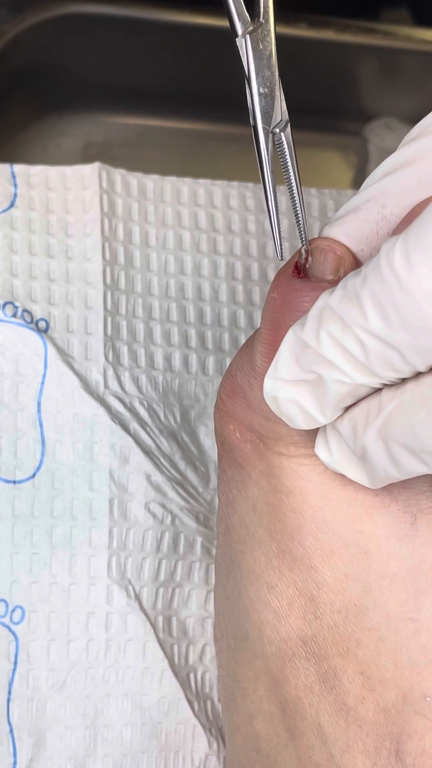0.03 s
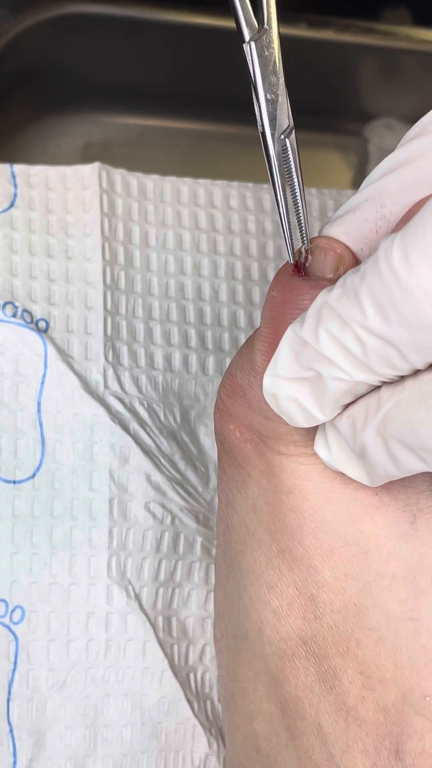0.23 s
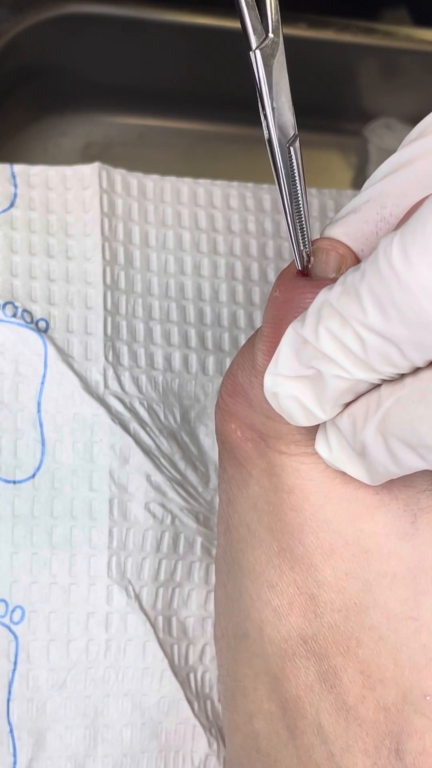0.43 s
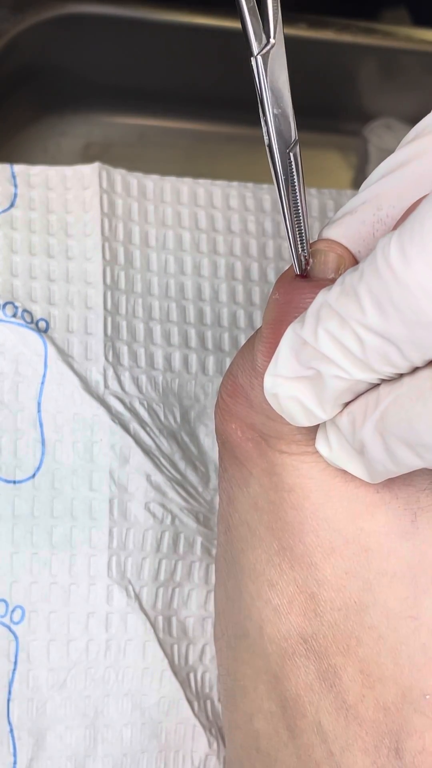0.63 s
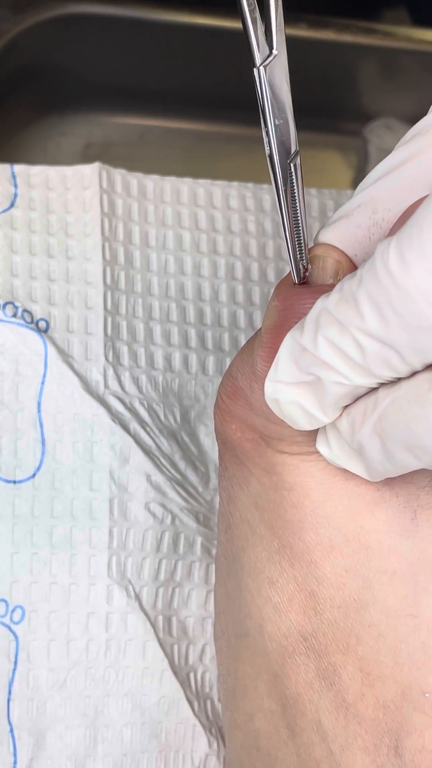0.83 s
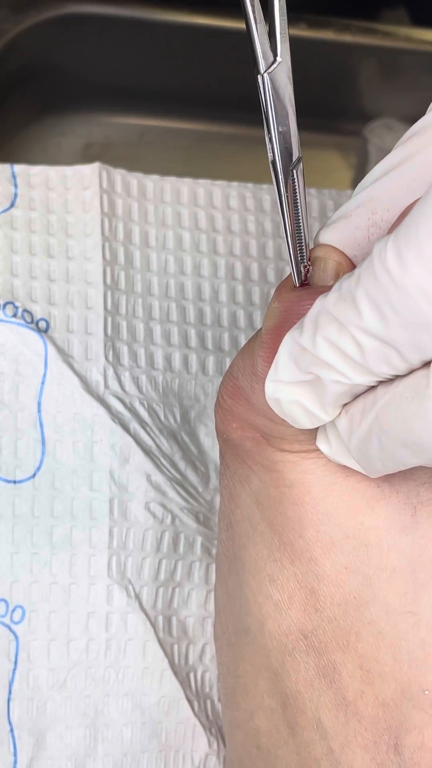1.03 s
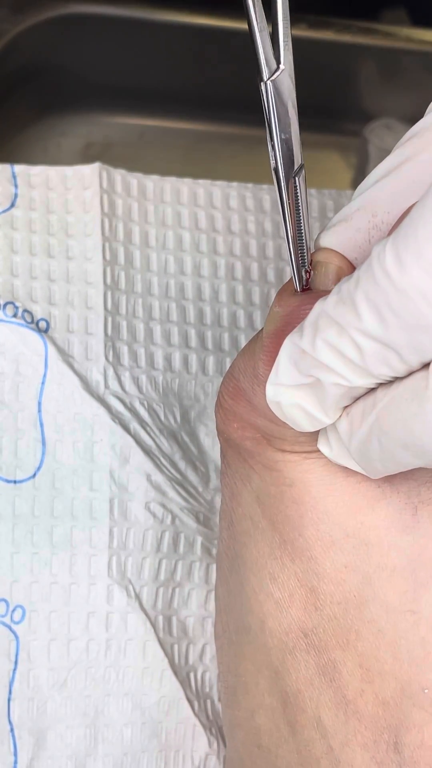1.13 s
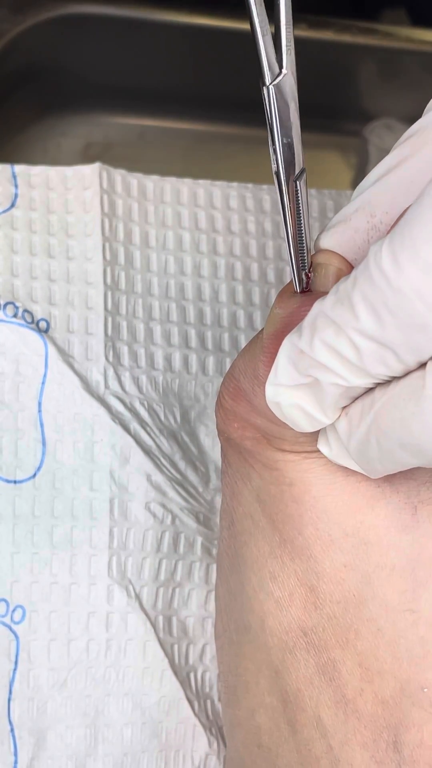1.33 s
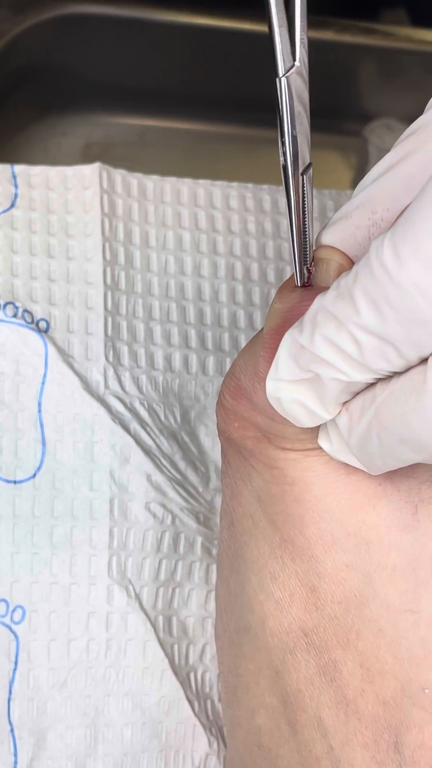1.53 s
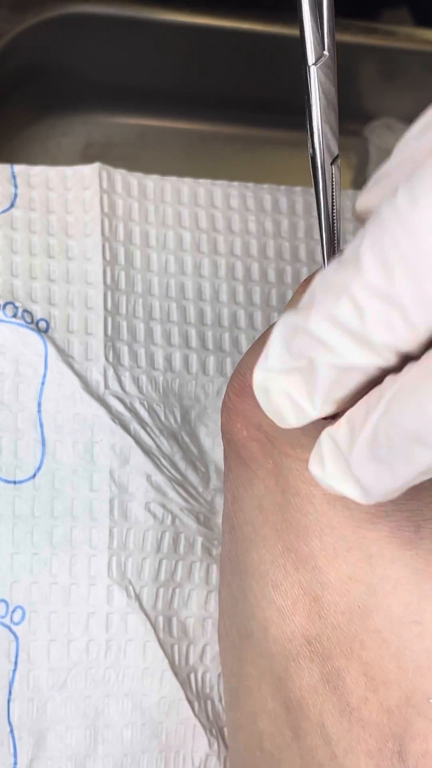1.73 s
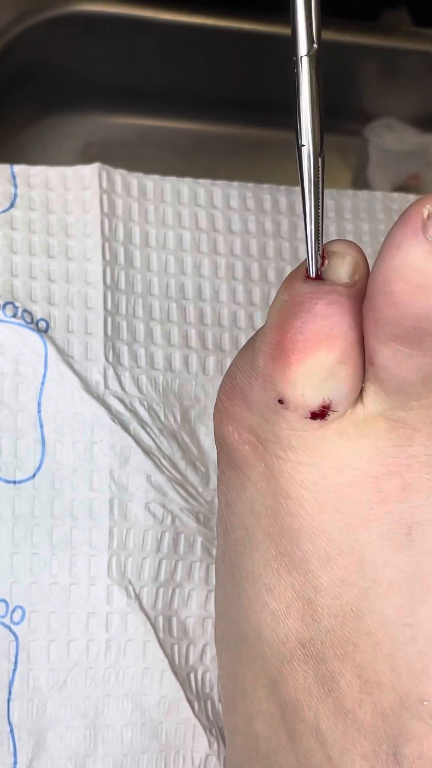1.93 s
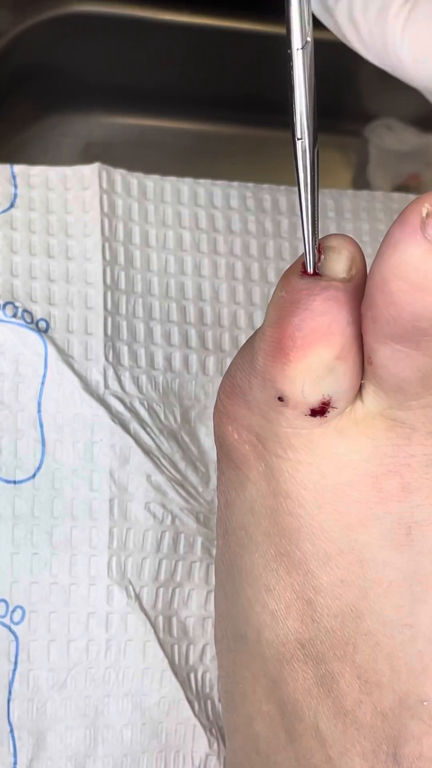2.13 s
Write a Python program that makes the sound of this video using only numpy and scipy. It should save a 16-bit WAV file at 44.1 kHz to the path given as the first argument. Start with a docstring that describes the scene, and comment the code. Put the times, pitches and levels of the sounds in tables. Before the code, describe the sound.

Quiet ventilation rumble and a few barely audible dull brushes come first, then a close metal clamp snaps twice, dry and piercing, with a short small-room tail, tiny metallic ticks and faint paper rustle.

```python
"""A steel surgical clamp is squeezed shut close by: two ratchet teeth snap home, with tiny ticks around them.
Each blow rings a bank of short-lived sine modes with a gritty scrape; a small clinic room adds a noise tail.
A gloved hand rustles over a paper drape as crinkled hiss, and soft brushes are dull swells of noise.
Below lie ventilation rumble and hiss, made of shaped noise, and a wavering mains hum of sines."""
import sys
import numpy as np
from scipy import signal
from scipy.fft import rfft, irfft, next_fast_len
from scipy.io import wavfile
from scipy.ndimage import uniform_filter1d

SR = 44100
rng = np.random.default_rng(int(sys.argv[2]) if len(sys.argv) > 2 else 0)


def master_out(mix):
    """Clip the mix to full scale and print it as 16-bit PCM to the path in sys.argv[1]."""
    frames = np.transpose(np.atleast_2d(mix))
    ceiling = np.clip(frames, -1, 1)
    pcm = np.round(ceiling * 32767).astype(np.int16)
    wavfile.write(sys.argv[1], SR, pcm)


def linear_from_db(decibels):
    """Turn decibels (scalar or array-like) into linear amplitude factors; 0 gives 1."""
    return 10 ** (np.asarray(decibels, float) / 20)


N = 96138

# Steel modes of the clamp, damped by the hand: pitch_hz, relative level_db, t60_s
STEEL_MODES = [(320, -18, .012), (610, -10, .014), (980, -10, .011), (1450, -11, .004), (1900, -8, .006),
               (2620, -1.5, .0075), (3150, -11, .006), (3550, -11, .005), (4050, -18, .006),
               (4720, -9, .011), (5100, -10, .007), (5900, -14, .006), (6550, -10, .005), (7150, -4, .004),
               (7800, -2, .003), (8700, -5, .0036), (9780, 1, .0033), (10950, -12, .006),
               (12050, -3, .0045), (13060, -12, .005), (13360, -1, .003), (14100, 8, .0035),
               (15280, -4, .004), (16150, -16, .004)]
# Steel meets steel, a ratchet tooth lands and rebounds: start_s, level_db, centre_hz, spread_octaves
STEEL_BLOWS = [(1.465, -44.5, 9500, 0.47), (1.4644, -58, 3600, 0.23), (1.503, -57, 6600, 0.64),
               (1.513, -58.5, 2600, 0.27), (1.54632, -27, 2500, 1.3), (1.5467, -4, 11000, 1.5),
               (1.54785, -19, 2200, 1.4), (1.5482, -40, 330, .6), (1.60672, -24, 2500, 1.3),
               (1.607, -3, 12000, 1.7), (1.6073, -5, 14900, .08), (1.6077, -13, 6500, .5),
               (1.60825, -14, 2800, 1.5), (1.609, -37, 380, .6), (1.7274, -34, 10380, 0.65),
               (1.78, -46, 2600, 0.34), (1.786, -52, 3900, 0.42), (1.794, -48, 3100, 0.094),
               (1.836, -50.5, 4450, 1.1), (1.9322, -47, 2650, 0.1), (1.933, -45, 4100, 0.11),
               (2.079, -53, 635, 0.43)]
# How long the room rings: frequency_hz, t60_s
ROOM_DECAY = [(300, 0.44), (1000, 0.16), (2500, 0.32), (5000, 0.3), (9000, 0.14), (15000, 0.9)]
# Colour of the room tail at its start: frequency_hz, relative level_db
ROOM_COLOUR = [(300, 7), (650, 8), (1300, 2.5), (2000, 2), (2800, -0.5), (3500, 3), (5000, 0.5),
               (7000, -3.5), (10000, -7.5), (12000, -9), (13500, -27.5), (15500, -16.5)]
# Hand and paper moving: time_s, level_db
HAND_MOVES = [(1.44, -99), (1.47, -85), (1.7, -64), (1.74, -60.5), (1.8, -72.5), (1.86, -74), (1.92, -68.5),
              (1.966, -67), (1.98, -82.5), (2.05, -81), (2.13, -79.5), (2.155, -72.5), (2.18, -65)]
# Colour of the papery hiss: frequency_hz, relative level_db (per Hz)
PAPER_COLOUR = [(500, -23), (1000, -8), (2700, 2), (4500, -4.5), (7000, -6), (10000, -4), (14500, -13),
                (16500, -11)]
# Soft dull brushes and bumps further off: peak_s, level_db, rise_s, fall_s, top_hz
BRUSH_MOVES = [(0.679, -64, 0.026, 0.077, 2330), (0.841, -60.5, 0.16, .045, 312),
               (1.012, -50.5, 0.041, 0.07, 185.5), (1.0, -59.5, 0.048, .05, 475),
               (1.188, -59.5, 0.1, 0.062, 198.4), (2.079, -71, 0.0032, 0.028, 910)]
# Colour of the brushes: frequency_hz, relative level_db (per Hz)
BRUSH_COLOUR = [(60, -27), (130, -5), (200, -12.5), (600, -11), (1200, -16), (3000, -23.5)]
# Uneven level of the low rumble: time_s, level_db
RUMBLE_LEVEL = [(0.0, -44.5), (0.07, -53.5), (0.389, -52), (0.409, -60.5), (0.54, -54), (0.56, -62.5),
                (0.68, -55.5), (0.76, -48.5), (0.79, -52.5), (0.811, -46.5), (1.2, -58.5), (1.24, -45.5),
                (1.289, -57), (1.38, -48), (1.82, -65), (1.85, -51), (1.999, -50), (2.18, -57)]
# Duct resonances: frequency_hz, relative level_db (per Hz)
DUCT_RESONANCES = [(15, -45), (28, -26), (38, -8), (46, -11), (53, 0), (62, -12), (72, -7), (85, -16),
                   (110, -40), (200, -120)]
# Colour of ventilation and room hiss: frequency_hz, relative level_db (per Hz)
AIR_COLOUR = [(40, -35), (80, -8), (110, 2.6), (200, 0.7), (350, -11), (600, -15.5), (1200, -25.5),
              (2500, -30.5), (4500, -39.5), (7000, -43), (10000, -45.5), (13000, -50), (16000, -64.5)]
# Mains hum, before its waver and lift: pitch_hz, level_db
MAINS_HUM = [(120, -73.5), (240, -76.5), (360.5, -78), (721, -88)]
# Left-right likeness of diffuse sound: frequency_hz, likeness (1 = identical)
LIKENESS = [(30, .99999), (70, .9995), (150, .96), (290, .85), (640, .4), (1400, .3), (2300, .8),
            (4000, .9), (7500, .95), (16000, .9)]
# Phase between the two microphone ports: frequency_hz, left_lead_radians
PORT_PHASE = [(0, 0), (150, -.03), (550, -.55), (1500, -.7), (2350, .85), (4600, .8), (5050, -.1),
              (5600, .6), (7600, 3.1), (10800, 6.1), (11800, 6.5), (14300, 9.4), (16000, 10.5), (22050, 14)]
# Balance between the two ports: frequency_hz, left_over_right_db
PORT_BALANCE = [(70, 0), (200, 1.4), (600, 1.8), (1200, .1), (16000, 0)]
# Random patchiness of each diffuse layer: layer name, spread_db
PATCHINESS = {"room": 1.2, "paper": 2., "brush": 2., "air": 1.6}


def evened(x):
    """Scales a signal to an rms of one."""
    return x / np.sqrt(np.mean(x ** 2) + 1e-20)


def read_curve(points, hz):
    """Reads a table between its points on a logarithmic frequency axis."""
    f, value = np.transpose(points)
    return np.interp(np.log(hz + 1), np.log(f + 1), value)


def follow(points):
    """Turns a table of time_s, level_db into a gain for every sample."""
    return linear_from_db(np.interp(np.arange(N) / SR, *np.transpose(points)))


def diffuse(size, field_db, patchy_db):
    """Stereo noise from random short-time spectra; field_db(hz, t) colours it, LIKENESS ties left to right."""
    hop = size // 4
    hz = np.fft.rfftfreq(size, 1 / SR)[:, None]
    t = np.arange(N // hop + 5) * hop / SR
    a, b, c, d, patches = rng.standard_normal((len(t), len(hz), 5)).T
    # level patches smoothed over neighbouring frequencies, then over time
    patches = uniform_filter1d(patches, size=8, axis=0)
    patches = evened(uniform_filter1d(patches, size=12, axis=1))
    same = np.clip(read_curve(LIKENESS, hz), -1, 1)
    left = a + 1j * b
    right = same * left + np.sqrt(1 - same ** 2) * (c + 1j * d)
    spectra = np.array([left, right]) * linear_from_db(field_db(hz, t) + patchy_db * patches)
    return signal.istft(spectra, nperseg=size, noverlap=size - hop)[1][:, :N]


def clamp():
    """Blows ring the steel modes nearest their centre and add a scrape; rows: direct, towards the walls."""
    contact_s = .00008  # time constant of a blow's rise
    scrape_db, scrape_s = -12, .001  # scrape peak before the blow's level, and its decay
    scatter_s = .006  # each blow reaches the walls by its own path, up to this much later
    room_blur = .3  # the walls hear the steel from all sides: modes blur, as if this much shorter
    length = 2000  # samples kept of a blow
    out = np.zeros((2, N + length))
    t = np.arange(length) / SR
    hz, mode_db, t60 = np.transpose(STEEL_MODES)[:, :, None]
    sign = (-1.) ** np.arange(len(hz))[:, None]
    grit = rng.standard_normal((len(STEEL_BLOWS), length))
    paths = (scatter_s * SR * rng.random(len(STEEL_BLOWS))).astype(int)
    for (start_s, level_db, centre_hz, octaves), noise, path in zip(STEEL_BLOWS, grit, paths):
        at = int(start_s * SR)
        since = np.maximum(t - (start_s * SR - at) / SR, 0)  # starts between samples
        share = np.exp(-.5 * (np.log2(hz / centre_hz) / octaves) ** 2) * linear_from_db(mode_db)
        rise = 1 - np.exp(-since / contact_s)
        for row, decay_s in enumerate((t60, room_blur * t60)):
            modes = sign * share * linear_from_db(-60 * since / decay_s) * np.sin(2 * np.pi * hz * since)
            ring = modes.sum(0) / np.linalg.norm(share)
            scrape = signal.oaconvolve(noise * np.exp(-since / scrape_s), ring)[:length]
            scrape = linear_from_db(scrape_db) * scrape / np.abs(scrape).max()
            begin = at + row * path
            out[row, begin:begin + length] += linear_from_db(level_db) * (ring + scrape) * rise
    return out[:, :N]


def room(spread):
    """The walls answer with a dense tail after a short gap, each band dying at its own speed."""
    room_db, gap_s = -7.5, .001

    def dying(hz, t):
        return read_curve(ROOM_COLOUR, hz) - 60 * t / read_curve(ROOM_DECAY, hz)

    tail = diffuse(size=128, field_db=dying, patchy_db=PATCHINESS["room"])[:, :SR // 2]
    tail = tail * (np.arange(SR // 2) > gap_s * SR)
    tail = tail / np.linalg.norm(tail[0])
    return linear_from_db(room_db) * signal.fftconvolve(spread[None], tail, axes=1)[:, :N]


def rustle():
    """Fine crinkles of uneven size roughen a papery hiss that follows the hand."""
    grains_per_s, grain_db = 4000, 2.5  # average density; scale of the random size
    crinkle_s = .001  # decay of one crinkle
    sizes = linear_from_db(grain_db * np.minimum(rng.exponential(1, N), 5))
    grains = sizes * (rng.random(N) < grains_per_s / SR)
    crinkle = signal.lfilter([1], [1, -np.exp(-1 / (crinkle_s * SR))], grains)
    hiss = diffuse(size=256, field_db=lambda hz, t: read_curve(PAPER_COLOUR, hz),
                   patchy_db=PATCHINESS["paper"])
    return evened(hiss * crinkle) * follow(HAND_MOVES)


def brushes():
    """Dull noise swells and fades for each brush, dark above its top frequency."""
    t = np.arange(N) / SR
    out = np.zeros((2, N))
    for peak_s, level_db, rise_s, fall_s, top_hz in BRUSH_MOVES:
        def dull(hz, t):
            return read_curve(BRUSH_COLOUR, hz) - 10 * np.log10(1 + (hz / top_hz) ** 8)

        noise = evened(diffuse(size=512, field_db=dull, patchy_db=PATCHINESS["brush"]))
        swell = np.exp(-((t - peak_s) / rise_s) ** 2)
        fade = np.exp(-abs(t - peak_s) / fall_s)
        out += linear_from_db(level_db) * noise * np.where(t < peak_s, swell, fade)
    return out


def rumble():
    """Noise in the low duct resonances, the same in both channels, at an uneven level."""
    steady_s, steady_share = .08, .7  # slow chance swings are evened out over this time, by this share
    spectrum = rng.standard_normal((N // 2 + 1, 2)) @ [1, 1j]
    resonances = linear_from_db(read_curve(DUCT_RESONANCES, np.fft.rfftfreq(N, 1 / SR)))
    noise = evened(irfft(spectrum * resonances, N))
    window = np.hanning(int(2 * steady_s * SR)) / (steady_s * SR)
    slow_power = signal.fftconvolve(noise ** 2, window, "same")
    steady = noise / (abs(slow_power) + .05) ** (steady_share / 2)
    return evened(steady) * follow(RUMBLE_LEVEL)


def air():
    """Ventilation and room hiss: a steady bed of wide, mostly low noise."""
    bed = diffuse(size=2048, field_db=lambda hz, t: read_curve(AIR_COLOUR, hz),
                  patchy_db=PATCHINESS["air"])
    return linear_from_db(-62.5) * evened(bed)


def hum():
    """Mains hum: sine partials, each wavering in level from its own random phase."""
    t = np.arange(N) / SR
    out = np.zeros(N)
    for pitch_hz, level_db in MAINS_HUM:
        waver_db = 3.5 + 6.5 * np.sin(2 * np.pi * (2.1 * t + rng.random()))  # 2.1 Hz around a lift
        out += linear_from_db(level_db + waver_db) * np.sin(2 * np.pi * (pitch_hz * t + rng.random()))
    return out


def scene():
    """Sums the direct steel, its room tail, the hand and the background."""
    steel, spread = clamp()
    return steel + room(spread) + rustle() + brushes() + rumble() + air() + hum()


def band_limit(x):
    """A steep low-pass at the top of the band."""
    return signal.sosfilt(signal.butter(12, 17170, fs=SR, output="sos"), x)


def record(dry):
    """Two microphone ports hear each frequency with their own phase and balance, up to a treble limit."""
    edge_hz = 16200
    size = next_fast_len(N + 2000)  # spare samples for the filter's ringing
    hz = np.fft.rfftfreq(size, 1 / SR)
    # half the phase and level difference goes to each side
    phase = np.exp(.5j * np.interp(hz, *np.transpose(PORT_PHASE)))
    half = phase * linear_from_db(.5 * read_curve(PORT_BALANCE, hz))
    treble_limit = 1 / np.sqrt(1 + (hz / edge_hz) ** 60)
    finished = irfft(rfft(dry, size) * np.array([half, 1 / half]) * treble_limit, size)[:, :N]
    return band_limit(finished)


dry = scene()
out = record(dry)
master_out(out)
```